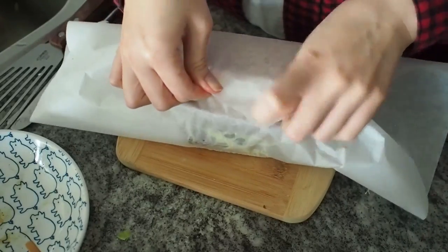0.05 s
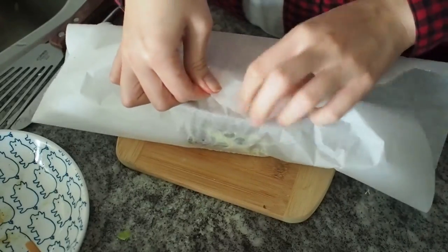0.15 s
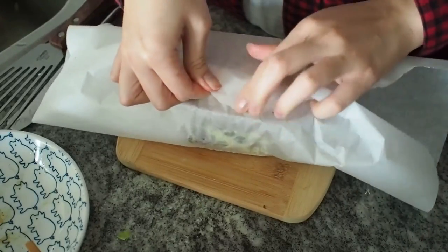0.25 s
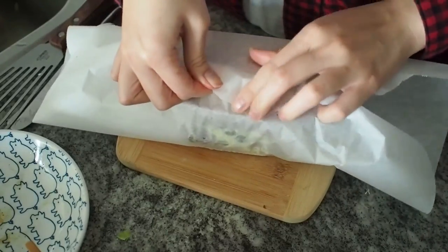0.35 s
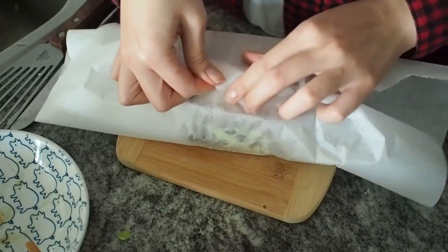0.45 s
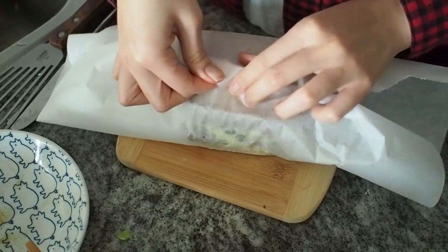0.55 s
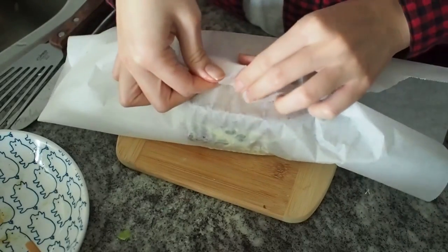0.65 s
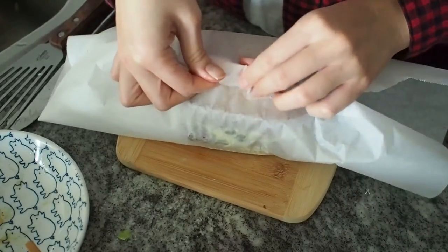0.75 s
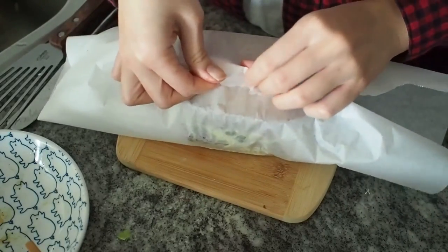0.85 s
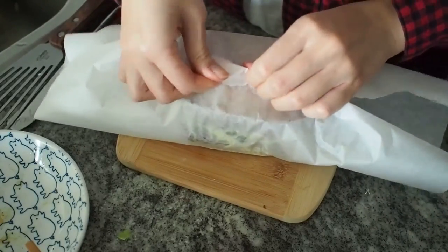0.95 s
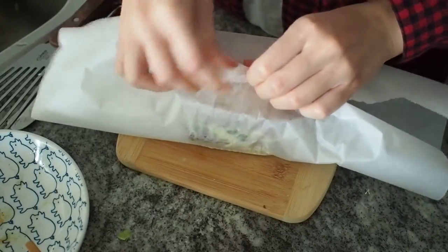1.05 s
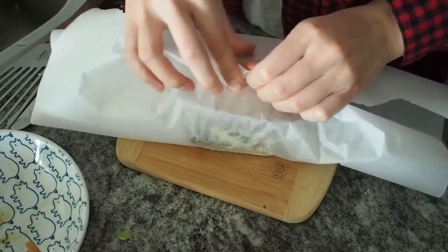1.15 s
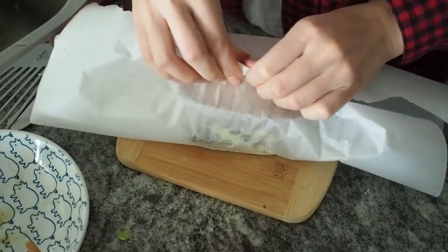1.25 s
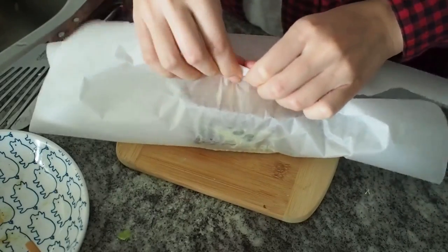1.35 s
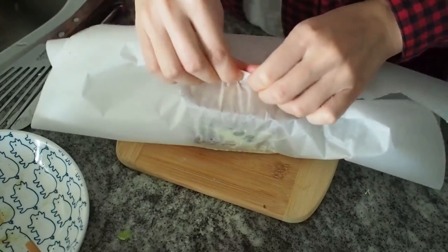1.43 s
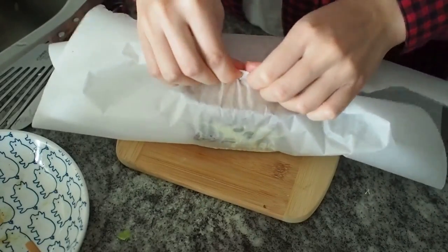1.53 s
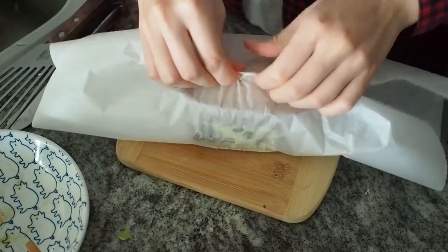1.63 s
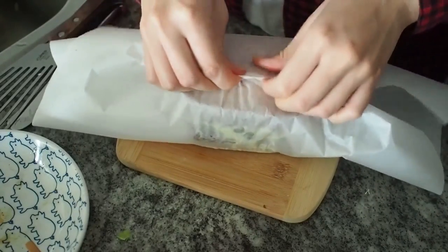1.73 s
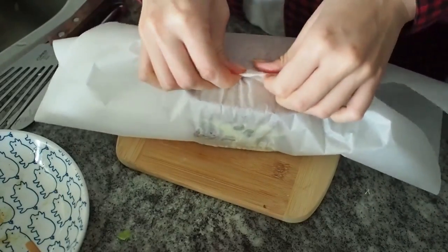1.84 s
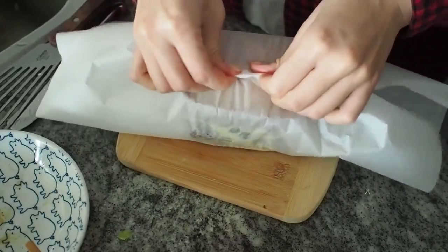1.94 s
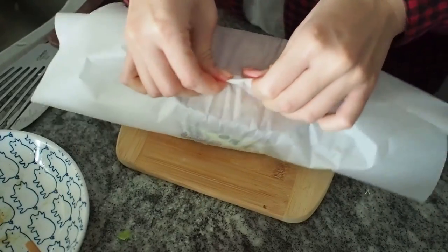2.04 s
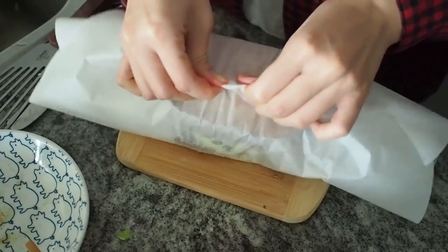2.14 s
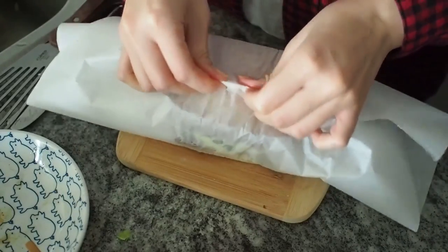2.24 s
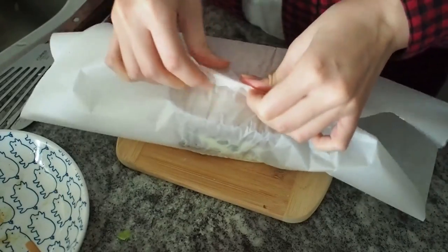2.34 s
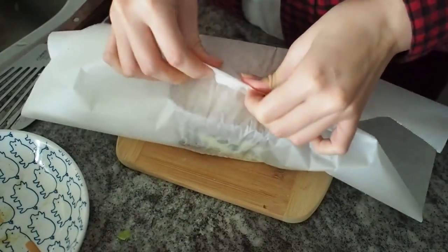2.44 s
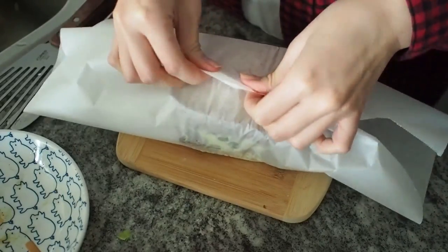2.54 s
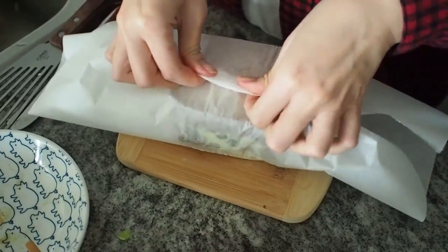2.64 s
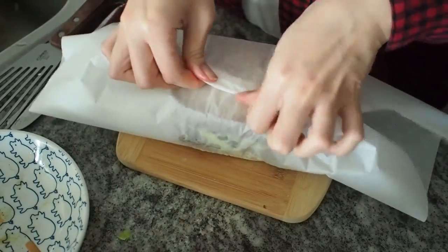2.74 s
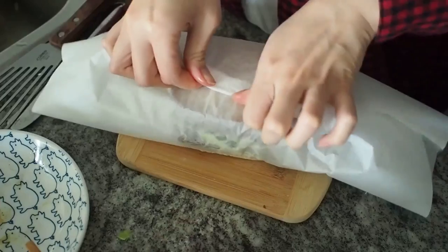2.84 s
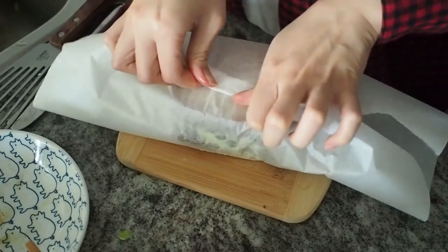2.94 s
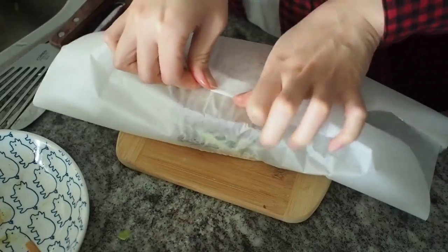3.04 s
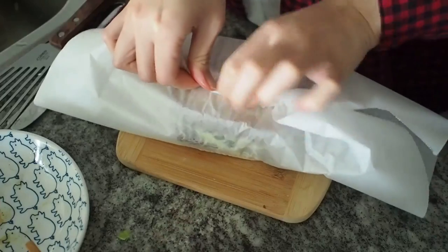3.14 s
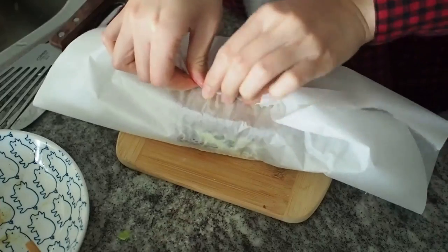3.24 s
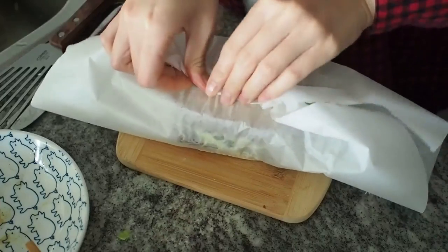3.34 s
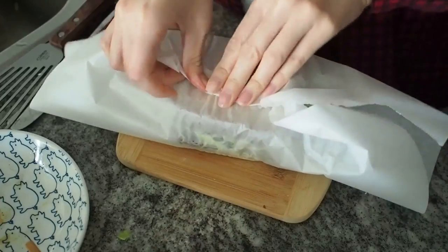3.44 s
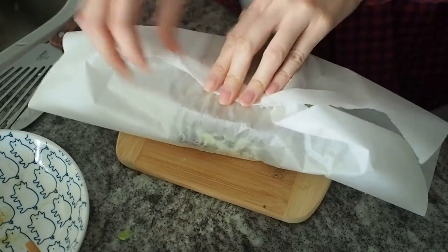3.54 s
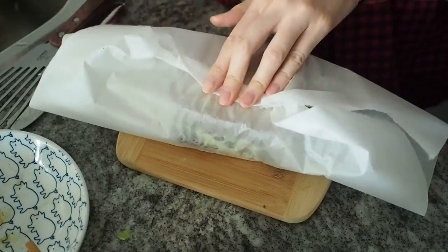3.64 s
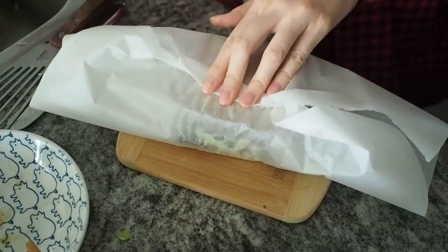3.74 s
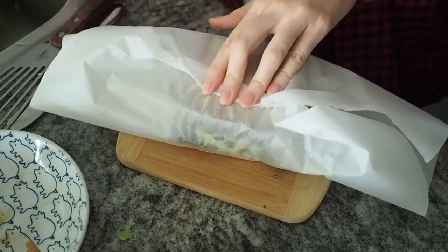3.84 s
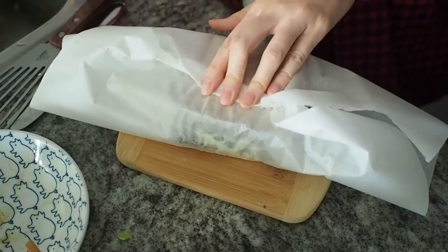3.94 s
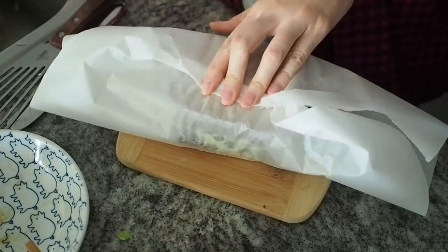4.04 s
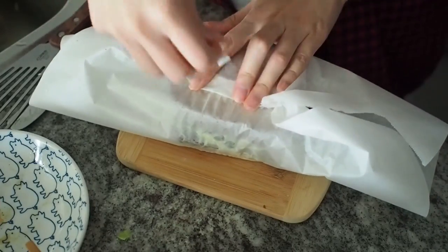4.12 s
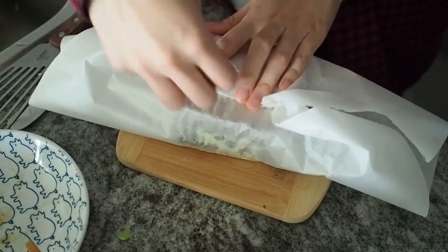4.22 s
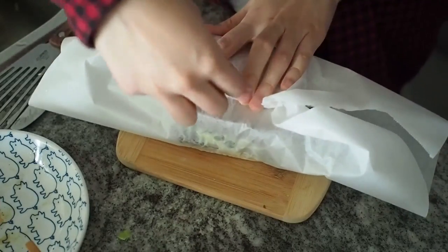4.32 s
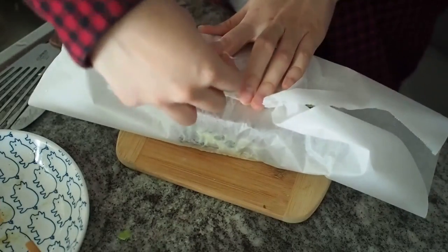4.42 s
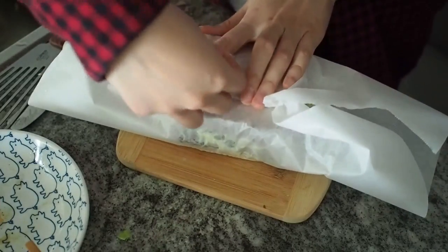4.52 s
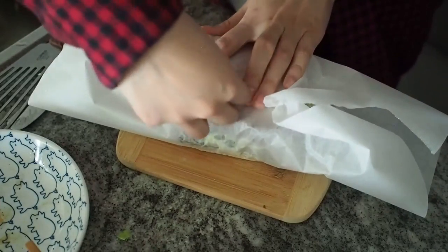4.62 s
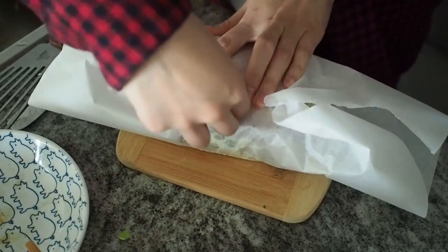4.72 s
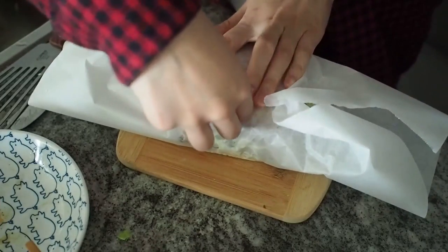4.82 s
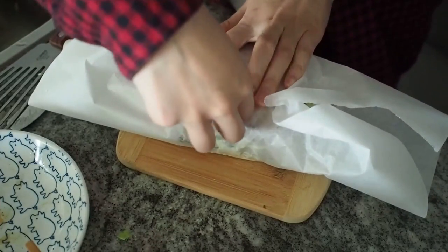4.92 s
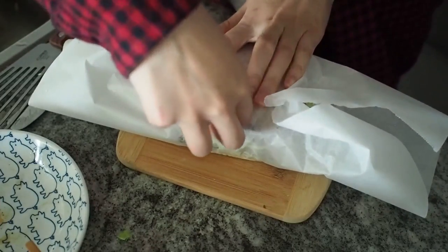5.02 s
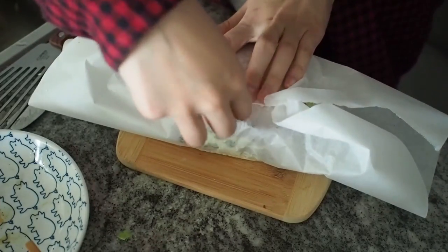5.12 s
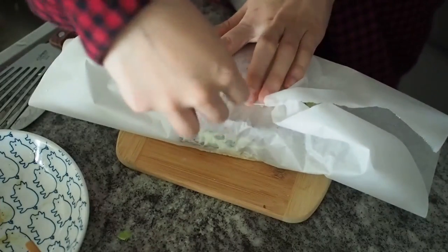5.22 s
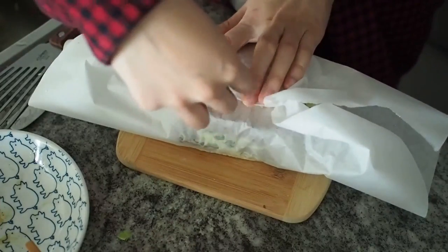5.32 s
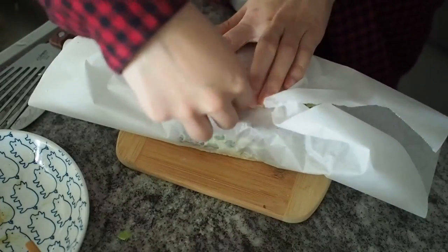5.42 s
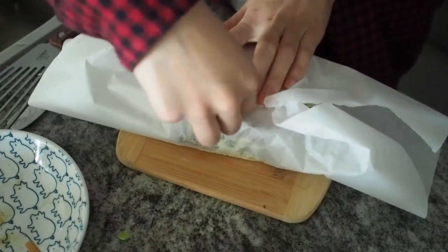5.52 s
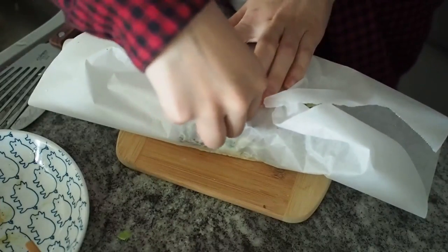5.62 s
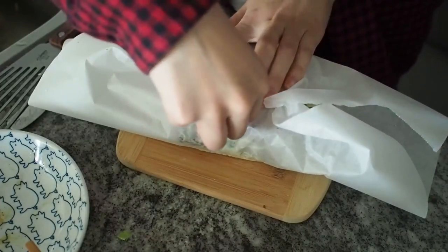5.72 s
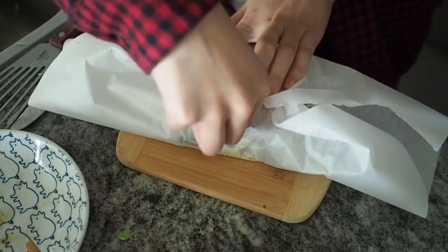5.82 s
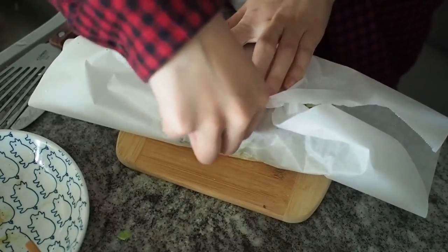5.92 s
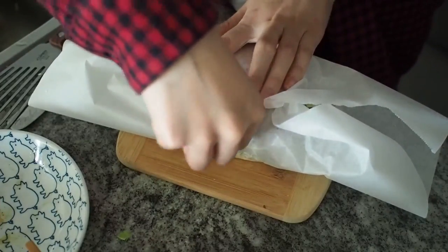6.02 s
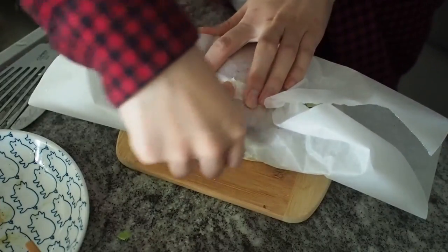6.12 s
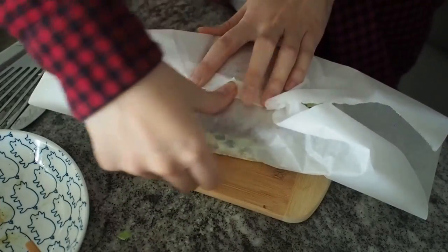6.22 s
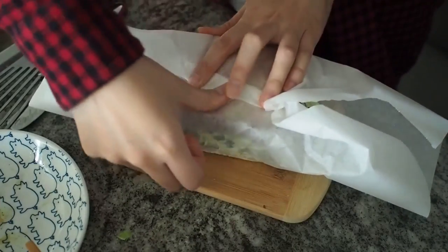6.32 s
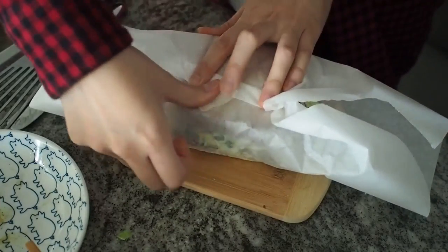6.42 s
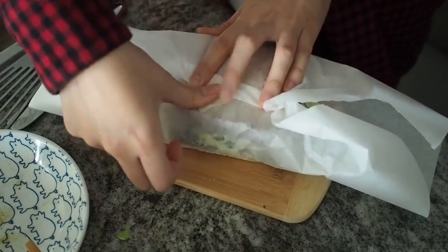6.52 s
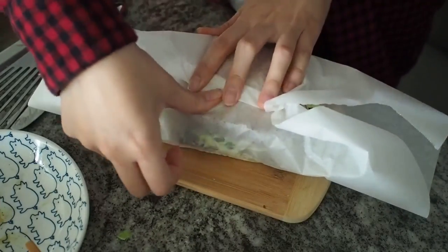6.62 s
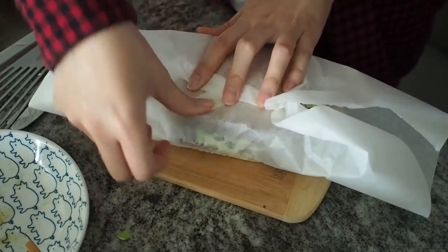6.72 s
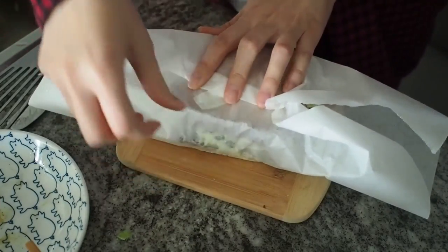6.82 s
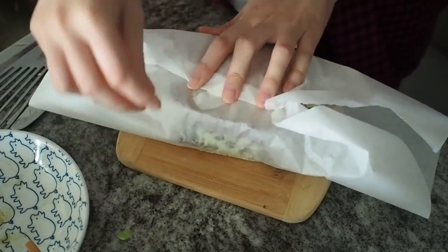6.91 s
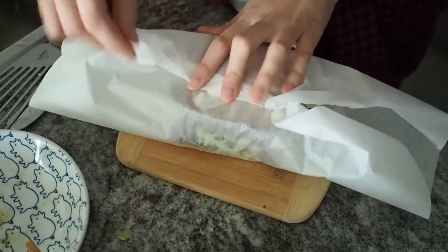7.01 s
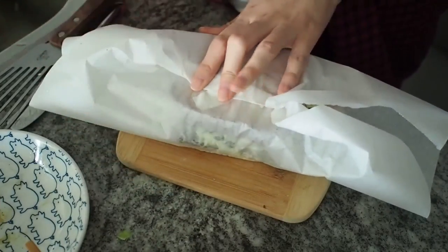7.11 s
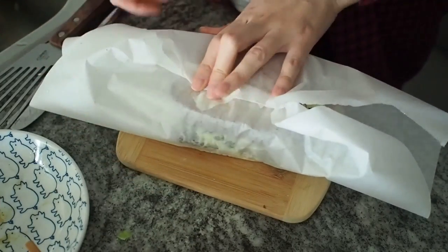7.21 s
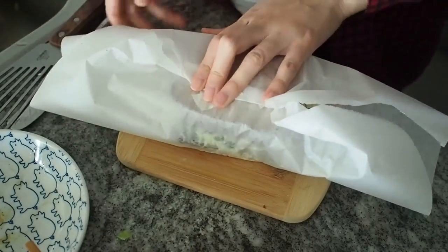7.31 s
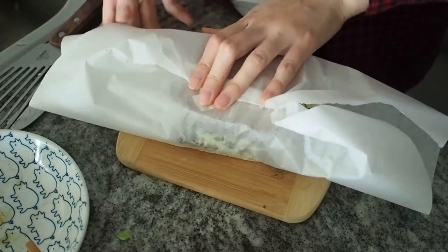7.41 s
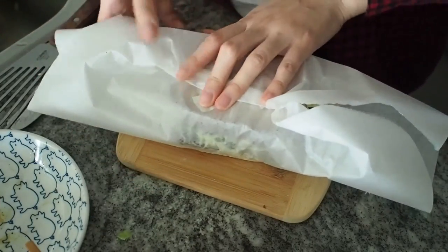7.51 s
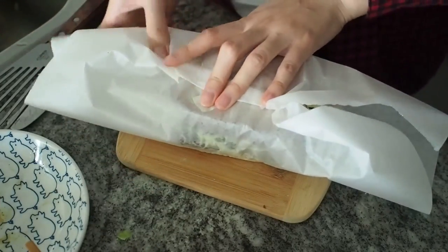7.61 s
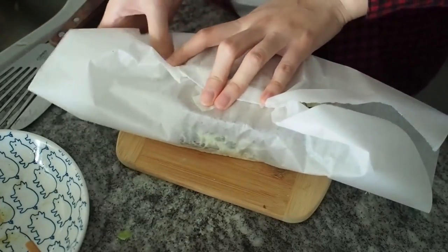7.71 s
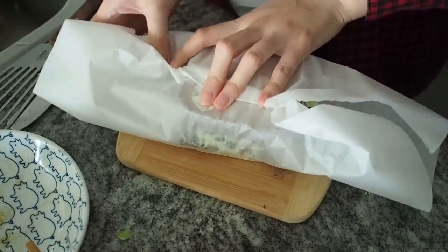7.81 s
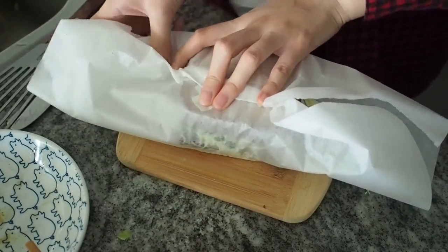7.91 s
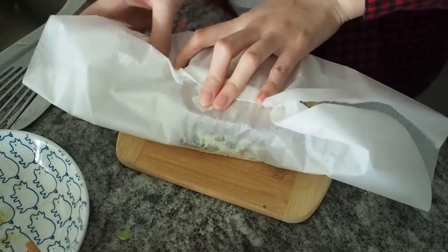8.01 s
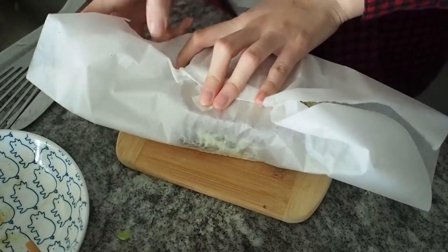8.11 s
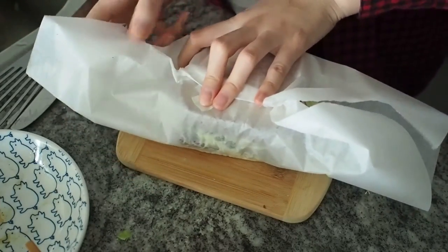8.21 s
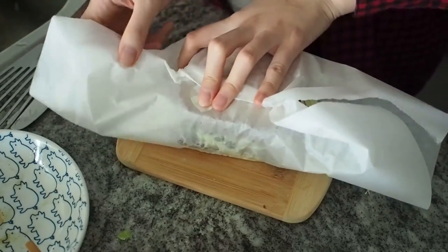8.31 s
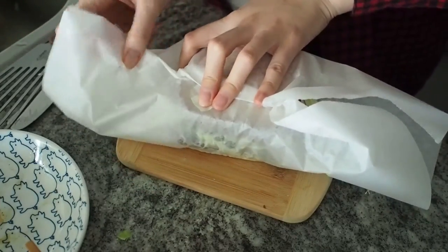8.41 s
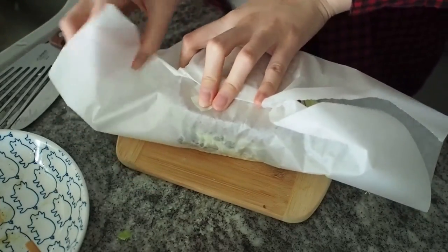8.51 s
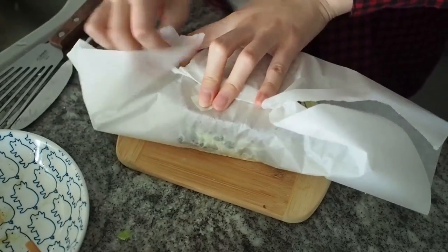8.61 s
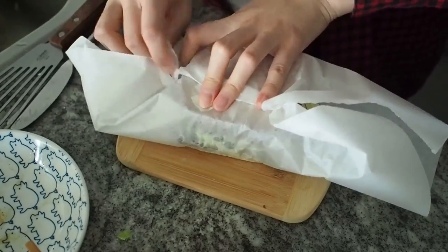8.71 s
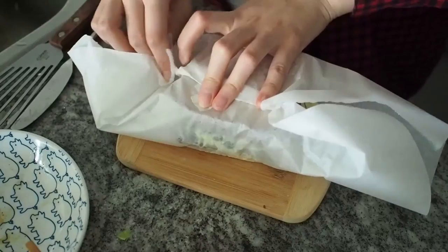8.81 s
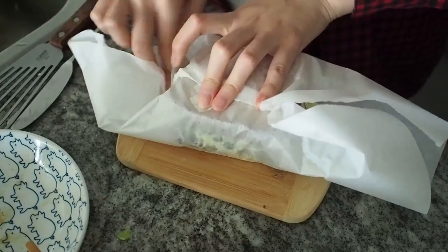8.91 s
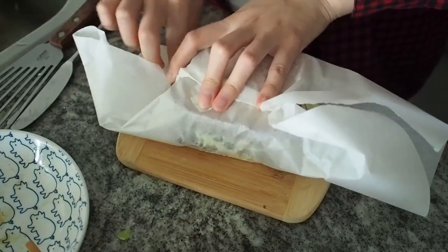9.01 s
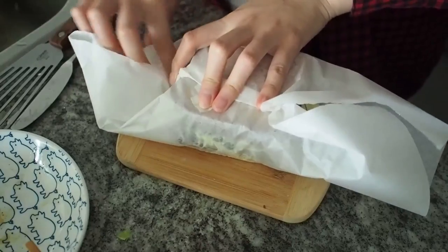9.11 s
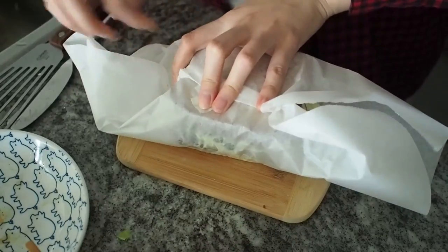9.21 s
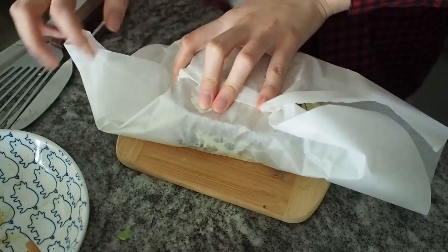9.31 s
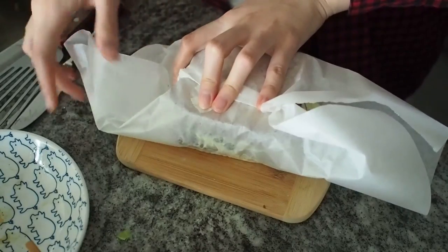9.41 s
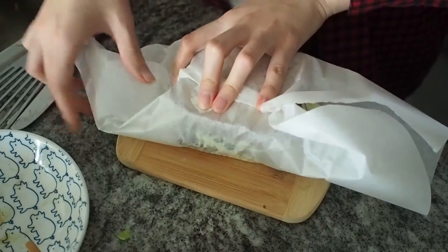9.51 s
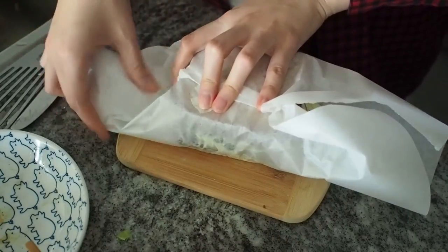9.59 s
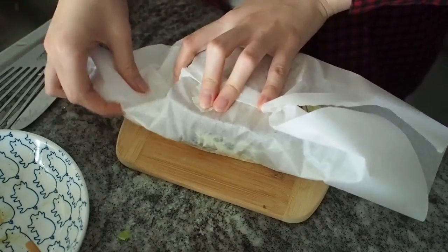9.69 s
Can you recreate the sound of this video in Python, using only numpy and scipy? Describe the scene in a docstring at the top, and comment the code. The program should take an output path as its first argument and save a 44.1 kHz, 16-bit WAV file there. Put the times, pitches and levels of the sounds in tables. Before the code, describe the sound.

Thin, stiff paper crinkles right in front of the microphone, with hissy rustle, individual creases popping and a soft low flutter from the flexing sheet. Busy at first, it nearly stops after a few seconds, leaving a steady low room hum and delicate crackles, then surges into strong rustling folds until the end. Hard kitchen surfaces add a brief bounce and light reverberation.

```python
"""Crisp paper crackle and bright rustle, close by: two hands roll and tuck parchment around food on a board.
Creases buckle in single snaps, each a short ring and a broad crack, and in swarms of tiny shivers over hiss.
The flexing sheet adds a soft low flutter, and a low hum with a few wavering tones lies underneath.
Hollow resonances, a counter bounce and diffuse kitchen echoes surround the paper.
Slow gain control eases the loud passages, so levels below are those ahead of it."""
import sys
import numpy as np
from scipy import signal
from scipy.fft import rfft, irfft, next_fast_len
from scipy.io import wavfile

SR = 44100
rng = np.random.default_rng(int(sys.argv[2]) if len(sys.argv) > 2 else 0)


def generate_wav(sig):
    """Save sig (samples, or channels by samples) to the path in sys.argv[1] as 16-bit PCM at SR."""
    pcm = np.round(np.clip(np.atleast_2d(sig).T, -1, 1) * 32767).astype(np.int16)
    wavfile.write(sys.argv[1], SR, pcm)


N = 429975

# Colour of a single crack. Each row: frequency in Hz, relative density in dB per Hz.
CRACK_COLOUR = [(150, -38.5), (400, -10.5), (1400, -1.5), (2050, -5.5), (3400, 2.5), (5300, -4), (7800, 0),
                (12000, -2), (16000, -6.5)]
# How alike close sounds reach the two microphone ports. Each row: frequency in Hz, correlation.
NEAR_LIKENESS = [(100, 0.96), (1000, 1), (2500, 0.89), (5000, 0.36), (9000, 0.37), (16000, 0.04)]
# How alike the room reaches the two microphone ports. Each row: frequency in Hz, correlation.
ROOM_LIKENESS = [(30, 0.96), (150, 0.77), (500, 0.76), (1200, 0.68), (2500, 0.29), (5000, 0), (16000, 0.68)]


def handwork(attack_s=0.012, release_db_per_s=205, resting_db=-63, grip_db=0.95, grip_per_s=18):
    """Effort of the fingers as a level in dB: each push sets in, swells or eases, and dies away."""
    # Pushes that roll, press and tuck the sheet. Each row: start in seconds, length in seconds,
    # mid-push effort in dB, swell from start to end in dB.
    strokes = [(0.0, 0.18, -23.5, 5), (0.309, .27, -26.5, 7), (0.637, 0.045, -24.5, 2),
               (0.713, 0.1, -25.5, 4.5), (0.925, 0.18, -23.5, 2.5), (1.191, 0.19, -23.5, 5.5),
               (1.455, 0.031, -24, -8), (1.551, 0.03, -23, 2), (1.636, 0.2, -27, 5.5),
               (1.89, 0.33, -27.5, -11), (2.208, 0.27, -23.5, 2.5), (2.526, 0.28, -23, -0.5),
               (2.859, .042, -17.5, -1.5), (2.945, 0.038, -24.5, 2.5), (3.044, 0.019, -19, -3),
               (3.179, 0.07, -24.5, 3.5), (3.352, 0.11, -23.5, 1), (3.492, 0.096, -26.5, -11),
               (3.666, 0.28, -43.5, -3), (4.09, 0.11, -36.5, -2), (4.584, 0.085, -42, -11),
               (4.767, 0.3, -59, 5), (5.47, .125, -46.5, -12), (5.82, .28, -50, 3), (6.137, 0.1, -37.5, 0),
               (6.385, .095, -37.5, -4), (6.567, 0.039, -31, -8), (6.648, 0.15, -43, 18.5),
               (7.018, 0.4, -36.5, 4.5), (7.471, .155, -22, 10.5), (7.65, 0.29, -22.5, -1),
               (7.987, 0.084, -18.5, -2), (8.112, 0.12, -23.5, -2), (8.289, 0.13, -19, -10.5),
               (8.465, 0.25, -21.5, 4), (8.759, 0.21, -17, 2.5), (9.045, 0.14, -29, 11),
               (9.51, 0.083, -37, 4), (9.556, 0.097, -19, 14), (9.683, 0.042, -14, -3)]
    t = np.arange(N) / SR
    # between pushes the fingers only rest on the paper
    power = np.full(N, amp(resting_db) ** 2)
    for start, length, level_db, swell_db in strokes:
        first = max(round(start * SR), 0)
        age = t[:min(SR, N - first)]
        onset = np.minimum(age / attack_s, 1)
        held_db = level_db + swell_db * (np.minimum(age / length, 1) - .5)
        released_db = release_db_per_s * np.maximum(age - length, 0)
        power[first:first + len(age)] += (onset * amp(held_db - released_db)) ** 2
    # the grip tightens and slips within a push
    return 10 * np.log10(power) + grip_db * wander(grip_per_s)


def snaps(rows, ring_cycles=1.4, crack_s=0.0013, port_lag_s=.00004, ring_trim_db=-2.0, size=768):
    """Each snap is a few cycles of the facet that flipped and a broad crack; returns both."""
    span = np.sqrt(.005 * SR)  # row levels are rms over 5 ms
    t = np.arange(size) / SR
    rings, cracks = np.zeros((2, N)), np.zeros((2, N))
    for s, hz, ring_db, crack_db in rows:
        place, length = rng.standard_normal(2)
        # a facet off centre reaches one port a little before the other
        lag_s = np.array([[-.5], [.5]]) * place * port_lag_s
        envelope = np.exp(-t * hz / ring_cycles) * (1 - np.exp(-2 * t * hz))
        ring = np.sin(2 * np.pi * hz * (t + lag_s)) * envelope
        add(rings, s, amp(ring_db) * span * evened(ring) / np.sqrt(size))
        add(cracks, s, amp(crack_db) * span * burst(crack_s * np.exp(0.27 * length)))
        # a crease runs in jerks: smaller slips come just before and after the main one
        for slip_s in rng.uniform([-.002, .001], [0, .006]):
            add(cracks, s + slip_s, amp(crack_db - 7.0) * span * burst(crack_s / 2))
    return amp(ring_trim_db) * rings, colour(cracks, CRACK_COLOUR)


def small_snaps(level_db, typical_db=-24, follow=0.74, spread_db=3, ring_db=-3, detune=.18, count=110):
    """Further creases give way at random, louder under harder work; returns rows for snaps()."""
    # Small, medium and large facets between the creases. Each entry: central pitch in Hz.
    facet_pitches = [8100, 3620, 1460]
    rows = []
    for k in range(count):
        when, facet = rng.random(2)
        pitch, ring, crack = np.clip(rng.standard_normal(3), -2, 2)
        at = int((k + when) / count * N)  # one in each equal slice of time
        db = typical_db + follow * (level_db[at] + 25)
        hz = facet_pitches[int(facet * len(facet_pitches))] * np.exp(detune * pitch)
        rows.append((at / SR, hz, db + ring_db + spread_db * ring, db + spread_db * crack))
    return rows


def rustle(level_db, per_s=480, crowding=.7, spread_db=4.0, tint_db=4.0, patchy_db=2.7, brighten=0.12,
           light_tilt_db=1.0, slide_share=.05, shiver_s=.0004, facet_cycles=2.0, count=9):
    """Swarms of tiny buckles, denser under harder work, over the hiss of paper sliding on paper."""
    # Colour of the crinkling sheet. Each row: frequency in Hz, relative density in dB per Hz.
    sheet_colour = [(100, -36.5), (250, -10.5), (360, -13), (450, -3.5), (700, -3.5), (900, -2),
                    (1550, 1.5), (2050, -2.5), (3200, 0.5), (4400, 0), (5300, -9), (7500, -5), (12000, -7),
                    (16000, -9.5)]
    effort_db = level_db + 25
    # a light touch is somewhat smoother and brighter, with fewer buckles and a little more hiss
    lightness = np.clip(-(effort_db + 10.0) / 16, 0, 1)
    smooth = np.clip(slide_share + 0.11 * lightness, 0, 1)
    rate = per_s * amp(crowding * np.maximum(effort_db, -9))  # buckles per second
    sizes = evened(amp(spread_db * np.minimum(rng.exponential(1, N), 2.6)))
    struck = rng.random(N) < rate / SR
    buckles = struck * sizes ** 2 * SR / rate  # power, 1 on average
    size = next_fast_len(N)
    shiver = rfft(ports(rng.standard_normal((2, N)), NEAR_LIKENESS), size)
    bins_hz = np.fft.rfftfreq(size, 1 / SR)
    centres = np.geomspace(500, 13000, count)
    sheet = 0
    for hz, share in zip(centres, np.eye(count)):
        # overlapping bands whose powers add up to the whole
        band_power = read(np.c_[centres, share], bins_hz)
        band = irfft(shiver * np.sqrt(band_power), size)[:, :N]
        # every buckle has its own tint, and the lower a facet rings the longer it lasts
        tint = evened(amp(tint_db * np.clip(rng.standard_normal(N), -2, 2)))
        r = np.exp(-2 / (SR * (shiver_s + facet_cycles / hz)))
        swarm = signal.lfilter([1 - r], [1, -r], buckles * tint ** 2)
        power = (1 - smooth) * swarm + smooth
        # the colour drifts as the sheet changes shape, and brightens under harder work
        tilt_db = brighten * np.maximum(effort_db, -3) + light_tilt_db * lightness  # per octave
        band_db = patchy_db * wander(30) + tilt_db * np.log2(hz / 3000)
        sheet = sheet + band * np.sqrt(power) * amp(band_db)
    return amp(level_db - 2.35) * colour(sheet, sheet_colour)


def ticks(level_db, above_db=23, follow=1.063, spread_db=3.5, tick_s=0.00019, count=260):
    """Single stiff fibres let go with tiny sharp ticks that stand out of the rustle."""
    out = np.zeros((2, N))
    for _ in range(count):
        at = rng.integers(N)
        size_db = spread_db * min(rng.exponential(1), 2)
        add(out, at / SR, amp(above_db + follow * level_db[at] + size_db) * burst(tick_s, size=128))
    return colour(out, CRACK_COLOUR)


def burst(decay_s, rise_s=.0001, size=512):
    """The sheet shivers for an instant after a crease gives way: decaying noise, unit energy a port."""
    t = np.arange(size) / SR
    noise = ports(rng.standard_normal((2, size)), NEAR_LIKENESS)
    shiver = noise * np.exp(-t / decay_s) * (1 - np.exp(-t / rise_s))
    return evened(shiver) / np.sqrt(size)


def flex():
    """Soft, uneven low flutter: air pushed by the whole sheet as it flexes under the fingers."""
    # Colour of the pushed air. Each row: frequency in Hz, relative density in dB per Hz.
    air_colour = [(30, -39), (85, -13), (150, 1), (215, 1.5), (330, -16), (600, -3), (2000, -95)]
    # How much the whole sheet is bent and pushed about. Each row: time in seconds, level in dB.
    bending = [(0, -38.5), (1.2, -40.5), (1.7, -40), (2.0, -43), (2.7, -44.5), (3.0, -41.5), (3.45, -45),
               (3.8, -52), (7.3, -74), (7.6, -39), (8.0, -49.5), (9.4, -48.5), (9.7, -42)]
    air = colour(ports(rng.standard_normal((2, N)), NEAR_LIKENESS), air_colour)
    flutter = evened(air * amp(3.1 * wander(25)))
    return flutter * amp(np.interp(np.arange(N) / SR, *np.transpose(bending)))


def hollow(x, size=12000):
    """Low, decaying resonances around the work top that the crinkling sets ringing."""
    # Hollow modes. Each row: frequency in Hz, gain in dB, 60 dB decay time in seconds.
    modes = [(432, -45, 0.16), (637, -50.5, 0.13), (743, -52, 0.22)]
    t = np.arange(size) / SR
    response = sum(amp(db - 60 * t / t60) * np.cos(2 * np.pi * hz * t) for hz, db, t60 in modes)
    return convolve(x, response)


def kitchen(x, count=5):
    """Crinkles come from changing spots on the sheet, each with its own echoes."""
    spots = np.array([wander(20) for _ in range(count)])
    spots = spots / np.linalg.norm(spots, axis=0)  # total power stays constant
    return sum(convolve(x * spot, echoes()) for spot in spots)


def echoes(counter_s=.0067, counter_db=-12, build_s=0.00033, size=20000):
    """One early bounce off the counter, and a diffuse noise tail that decays at its own pace per band."""
    # Reverberation time. Each row: frequency in Hz, 60 dB decay time in seconds.
    decay_times = [(200, 0.8), (3500, 0.52), (8000, 0.36), (16000, 0.35)]
    # Reverberation strength. Each row: frequency in Hz, gain in dB.
    strengths = [(200, -13), (1000, -3.5), (8000, -5), (16000, -7.5)]
    noise = ports(rng.standard_normal((2, size)), ROOM_LIKENESS)
    hz, frame_s, z = signal.stft(noise, SR, nperseg=256)
    t60 = read(decay_times, hz)[:, None]
    unit_energy = np.sqrt(2 * np.log(1000) / (t60 * SR))
    z = z * amp(read(strengths, hz)[:, None] - 60 * frame_s / t60) * unit_energy
    tail = signal.istft(z, SR, nperseg=256)[1][:, :size]
    tail = tail * (1 - np.exp(-np.arange(size) / SR / build_s))
    add(tail, counter_s, amp(counter_db) * burst(0.00042))
    return tail


def hum(air_db=-45, waver_hz=3):
    """Steady ventilation rumble of coloured noise with a few tones that waver in pitch."""
    # Colour of the rumble. Each row: frequency in Hz, relative density in dB per Hz.
    rumble_colour = [(20, -9), (45, -5), (90, 1), (135, 0), (200, -1), (300, -10), (550, -12.5),
                     (850, -6.5), (1550, -15), (2050, -23), (3000, -23.5), (5200, -31.5), (9000, -31),
                     (16000, -34)]
    # Tones within the hum. Each row: frequency in Hz, rms level in dB.
    tone_rows = [(91, -62.5), (116, -58), (139, -59.5), (323, -65.5)]
    air = evened(colour(ports(rng.standard_normal((2, N)), ROOM_LIKENESS), rumble_colour))
    tones = 0
    for hz, db in tone_rows:
        cycles = np.cumsum(hz + waver_hz * wander(10)) / SR
        tones = tones + amp(db) * np.sin(2 * np.pi * cycles)
    return amp(air_db) * air + np.sqrt(2) * tones


def amp(db):
    """Decibels to gain."""
    return np.exp(np.asarray(db) * (np.log(10) / 20))


def evened(x):
    """Scales to rms 1."""
    return x / np.sqrt(np.mean(x ** 2) + 1e-20)


def wander(per_s):
    """Smooth chance of rms 1: random values, per_s a second, joined by straight lines."""
    steps = np.arange(N) / SR * per_s
    knots = int(steps[-1]) + 2
    return evened(np.interp(steps, np.arange(knots), rng.standard_normal(knots)))


def read(points, hz):
    """Reads a table on a log-frequency axis."""
    f, value = np.transpose(points)
    return np.interp(np.log(hz + 1), np.log(f + 1), value)


def add(mix, s, sound):
    """Mixes a stereo sound in at time s, in place."""
    part = mix[:, max(round(s * SR), 0):][:, :sound.shape[1]]
    part += sound[:, :part.shape[1]]


def convolve(x, response):
    """Passes each channel through an impulse response."""
    return signal.oaconvolve(x, np.atleast_2d(response), axes=1)[:, :x.shape[1]]


def colour(x, points, size=2048):
    """Causal filter of unit energy with the given spectrum, so that attacks stay sharp."""
    log_gain = np.log(amp(read(points, abs(np.fft.fftfreq(size, 1 / SR)))))
    # the Hilbert transform of the log gain gives the minimum phase
    spectrum = np.exp(np.conj(signal.hilbert(log_gain)))
    response = np.fft.ifft(spectrum).real[:size // 2]
    return convolve(x, response / np.linalg.norm(response))


def ports(pair, likeness):
    """Blends two unrelated signals into left and right with the given correlation per frequency."""
    size = next_fast_len(pair.shape[1])
    c = np.clip(read(likeness, np.fft.rfftfreq(size, 1 / SR)), -1, 1)
    mid, side = rfft(pair, size) * np.sqrt([(1 + c) / 2, (1 - c) / 2])
    return irfft(np.array([mid + side, mid - side]), size)[:, :pair.shape[1]]


def scene(ring_room_db=-4, crack_room_db=-0.2, left_db=0.1):
    """The paper, a little to the left, in the humming kitchen."""
    # Snaps of creases, and a few low knocks of fingers or food on the board, that stand out from the rustle
    # around them, loud or faint. Each row: time in seconds, # pitch in Hz (of the buckling facet, or of the
    # knock), its ring in dB ahead of the ring trim, # its crack in dB ahead of the crack colour.
    main_snaps = [(0.0893, 3300, -18, -30), (0.173, 10000, -12, -13.5), (0.3766, 1170, -25.5, -24),
                  (0.4782, 1576, -14, -14), (0.5654, 3060, -14, -18.5), (0.6623, 8000, -16, -19),
                  (0.8015, 675, -19, -15.5), (0.8371, 2830, -23, -17.5), (1.0198, 3760, -17, -11.5),
                  (1.193, 2600, -41, -21), (1.3286, 3130, -14.5, -14), (1.464, 656, -17.5, -17),
                  (1.563, 3690, -35, -17.5), (1.776, 1340, -21, -15.5), (1.8876, 3380, -17, -33),
                  (1.997, 4540, -13.5, -14), (2.0318, 3620, -23, -14), (2.0682, 1170, -18, -21),
                  (2.1604, 3800, -24, -18), (2.2139, 8900, -16, -15), (2.2935, 3030, -22, -18),
                  (2.5075, 7200, -12, -15.5), (2.558, 1390, -36, -18), (2.8572, 617, -16, -19),
                  (2.9917, 720, -20, -25), (3.0153, 590, -19.5, -13), (3.1967, 7900, -22, -16),
                  (3.2072, 3130, -19, -17.5), (3.3084, 1270, -21, -17), (3.4357, 2440, -16, -10.5),
                  (3.521, 10700, -13, -24), (3.665, 3300, -26.5, -37), (3.74, 2790, -29, -27),
                  (3.7633, 1720, -27.5, -21.5), (3.8527, 1250, -24, -23.5), (4.0983, 3680, -32, -27),
                  (4.1558, 4350, -24, -20.5), (4.2238, 774, -30.5, -22), (4.3028, 604, -31, -78),
                  (4.4044, 1160, -35.5, -37), (4.5985, 3260, -26, -37), (4.6112, 3660, -32, -27),
                  (4.6625, 3800, -35, -30), (4.859, 7160, -32.5, -34), (5.0118, 8300, -26.5, -31),
                  (5.1354, 3070, -33, -50), (5.3533, 1560, -40, -45), (5.6513, 4100, -35.5, -39),
                  (5.7205, 1610, -47, -40), (5.759, 4240, -30, -32.5), (5.8578, 4500, -34, -30),
                  (5.8981, 3700, -24, -34.5), (5.9653, 1540, -28, -31.5), (6.0598, 1410, -37, -33.5),
                  (6.1384, 11100, -20, -25), (6.19, 2970, -18, -23), (6.24, 1370, -14, -24),
                  (6.421, 10600, -23, -24), (6.4592, 4930, -25, -24.5), (6.5608, 4070, -27, -32),
                  (6.5812, 1380, -38, -20), (6.612, 2930, -30, -22), (6.6465, 3800, -30, -40),
                  (6.6824, 3650, -30, -29), (6.7202, 8470, -21.5, -25), (6.8063, 2700, -24.5, -22),
                  (7.0466, 1440, -24.5, -26.5), (7.2263, 7400, -27, -23), (7.4706, 3520, -24, -37),
                  (7.57, 1040, -17, -24), (7.755, 3420, -12, -13), (7.822, 7300, -8, -12.5),
                  (7.9341, 3470, -15.5, -14.5), (8.014, 3730, -12, -28), (8.2881, 2940, -23, -25),
                  (8.3089, 1770, -10.5, -18), (8.3424, 1370, -13, -13), (8.521, 2840, -10.5, -14.5),
                  (8.6719, 4230, -16, -17), (8.7907, 3570, -13, -12), (9.1498, 2100, -14, -25),
                  (9.1859, 850, -19.5, -30), (9.2238, 9500, -13, -14), (9.3456, 2820, -30, -29),
                  (9.3727, 8000, -22, -30), (9.5067, 1610, -28, -29.5)]
    level_db = handwork()
    rings, cracks = snaps(main_snaps + small_snaps(level_db))
    swarm = rustle(level_db) + ticks(level_db)
    paper = rings + cracks + swarm
    # flat facets beam their ring up at the microphones, cracks scatter all round the room
    scattered = amp(ring_room_db) * rings + amp(crack_room_db) * cracks + swarm
    heard = paper + hollow(paper) + kitchen(scattered + hollow(scattered))
    return heard * amp([[left_db], [-left_db]]) + flex() + hum()


def record(dry, threshold_db=-36, squeeze=0.32, settle_s=0.32, edge_hz=16050):
    """Slow gain control (squeeze in dB per dB over), full-scale clipping and a low-pass band limit."""
    r = np.exp(-1 / (settle_s * SR))
    # the level follower starts already raised
    power = signal.lfilter([1 - r], [1, -r], (dry ** 2).mean(0), zi=[.004])[0]
    over_db = np.maximum(10 * np.log10(power + 1e-12) - threshold_db, 0)
    out = np.clip(dry * amp(-squeeze * over_db), -1, 1)
    low_pass = signal.firwin(401, edge_hz, window=("kaiser", 8), fs=SR)
    return signal.oaconvolve(out, low_pass[None], "same")


dry = scene()
out = record(dry)
generate_wav(out)
```